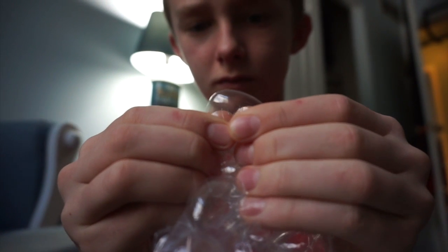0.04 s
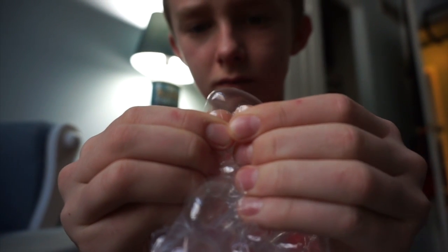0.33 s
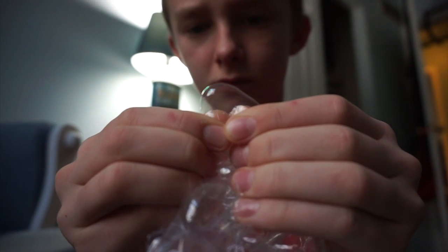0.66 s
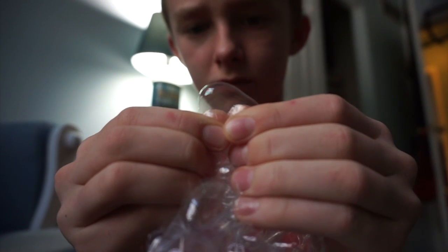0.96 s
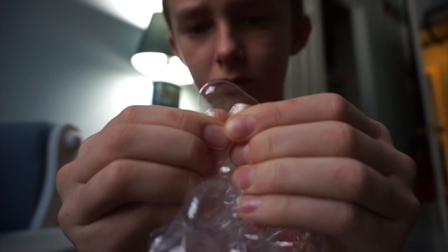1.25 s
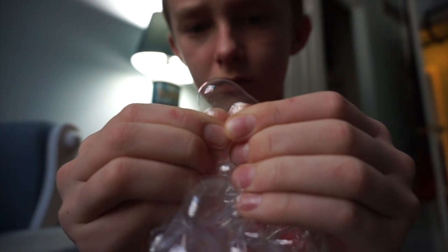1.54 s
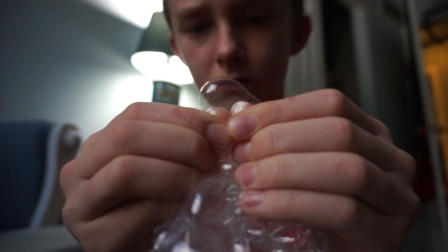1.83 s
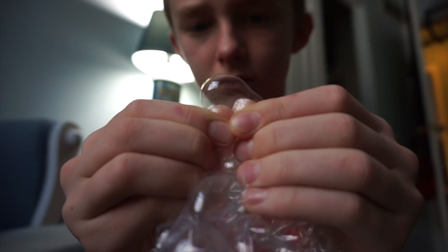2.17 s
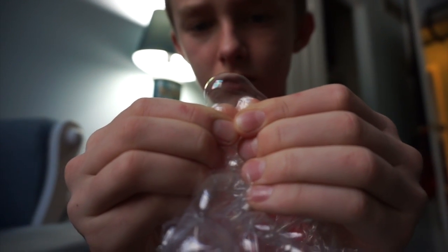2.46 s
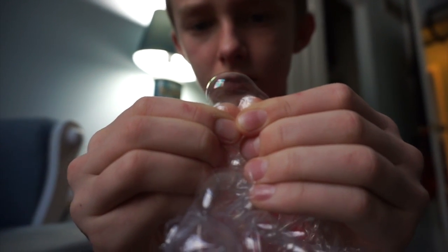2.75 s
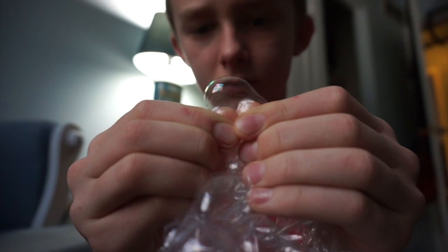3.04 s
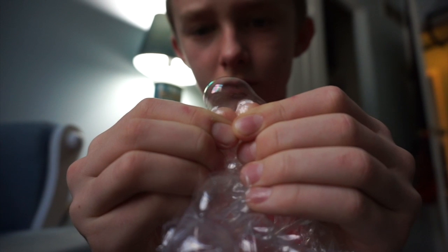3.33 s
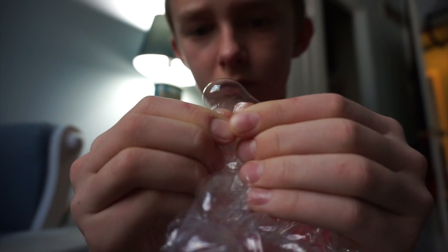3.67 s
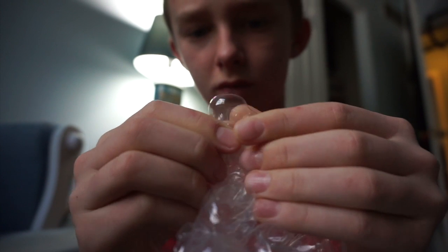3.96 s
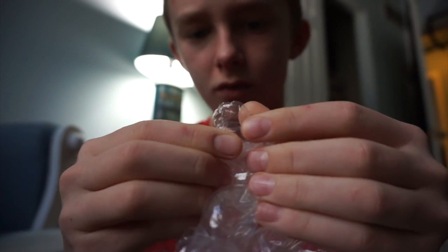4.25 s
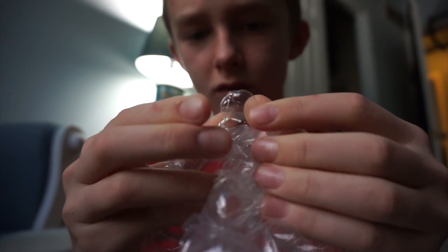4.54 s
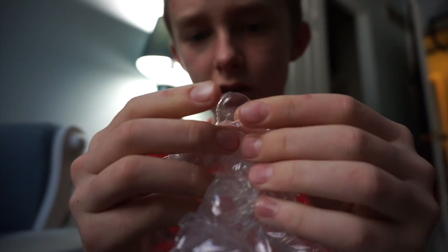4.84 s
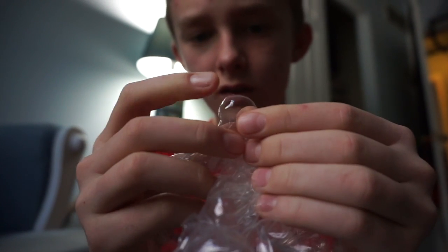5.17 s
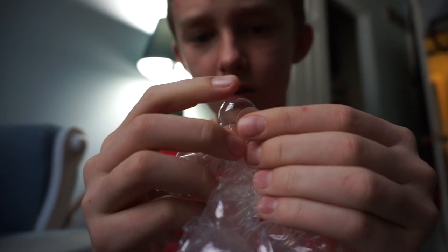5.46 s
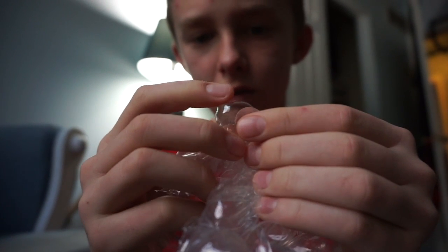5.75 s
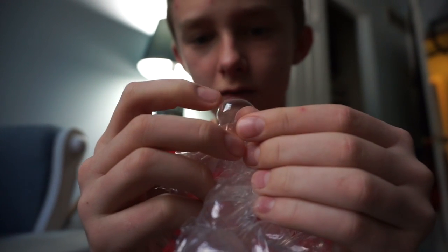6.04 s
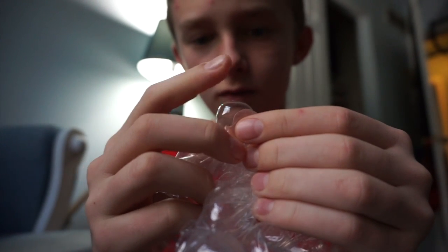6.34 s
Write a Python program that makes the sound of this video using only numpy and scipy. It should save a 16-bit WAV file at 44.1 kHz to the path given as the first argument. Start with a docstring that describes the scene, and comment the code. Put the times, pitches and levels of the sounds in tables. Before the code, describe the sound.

Close, sparse ticks of squeezed bubble wrap build into two seconds of crumpling, followed by sharp plastic snaps in a quiet room.

```python
"""Sparse ticks and snaps of bubble wrap pinched between two hands, close by in a small room.
The film ticks as pressure builds, crumples for two seconds as it is twisted, then gives a few sharp snaps.
Each is made of tiny buckles: a crease clicks, the film around it flexes and an air pocket rings.
The walls answer briefly, and a faint room tone lies underneath."""
import sys
import numpy as np
from scipy import signal
from scipy.fft import rfft, irfft, next_fast_len
from scipy.io import wavfile

SR = 44100
rng = np.random.default_rng(int(sys.argv[2]) if len(sys.argv) > 2 else 0)


def to_wav(s):
    """Save 16-bit WAV."""
    ch = np.atleast_2d(s).T  # columns
    pcm = np.round(np.clip(ch, -1, 1) * 32767)  # PCM
    wavfile.write(sys.argv[1], SR, pcm.astype(np.int16))


N = 282240
TOP_HZ = 11150  # upper edge of the treble


def amp(db):
    """Decibels to gain."""
    return 10 ** (np.asarray(db) / 20)


def along(points, hz):
    """Read a curve of (Hz, value) points on a log frequency axis."""
    point_hz, values = np.transpose(points)
    return np.interp(np.log(hz + 1), np.log(point_hz), values)


def filtered(x, gain):
    """Minimum-phase EQ with the curve gain(hz), so nothing rings ahead of a click."""
    size = 2 * next_fast_len(N // 2 + SR // 4)
    cepstrum = irfft(np.log(np.maximum(gain(np.fft.rfftfreq(size, 1 / SR)), 1e-6)))
    cepstrum[1:size // 2] *= 2
    cepstrum[size // 2 + 1:] = 0
    return irfft(rfft(x, size) * np.exp(rfft(cepstrum)), size)[:, :N]


def room_tone(level_db=-68.5):
    """Steady air noise of the room with a little hiss, wide except in the bass."""
    # Each row: frequency in Hz, relative noise density in dB.
    spectrum = [(24, -70), (40, -46), (124, -17.5), (156, -21), (332, -13.5), (518, -7), (656, -7),
                (1000, -1), (1180, -7), (1420, 1.5), (1720, -3.5), (2170, -4.5), (7730, -10.5), (10000, -9),
                (11000, -9), (14300, -41), (22000, -120)]
    # Each row: frequency in Hz, likeness of left and right (1 is mono, negatives count as 0).
    likeness = [(60, 0.64), (220, 0.15), (840, -0.077), (3120, 0.02), (11600, 0.14)]

    def noise(share):
        def gain(hz):
            width = np.arccos(np.clip(along(likeness, hz), 0, .99)) / 2
            return amp(along(spectrum, hz)) * share(width) / (1 + (hz / TOP_HZ) ** 40)
        return filtered(rng.standard_normal((1, N)), gain)[0]

    mid, side = noise(np.cos), noise(np.sin)
    return amp(level_db) * np.array([mid + side, mid - side]) / mid.std()


def room_reverb(x, wall_s=.0108, near_db=-11, slap=0.26, tails=5):
    """Weak scatter off the hands, the nearest wall, then a diffuse tail that changes as the sheet moves."""
    # Each row: frequency in Hz, seconds to die away by 60 dB.
    decay = [(200, 0.14), (1000, .26), (3000, 0.34), (7000, 0.33), (11000, .28)]
    # EQ of the reverb return. Each row: frequency in Hz, gain in dB.
    return_eq = [(200, -12.5), (1000, -9), (2500, -7), (5000, -8), (10000, -7.5)]
    wet = np.zeros((2, N))
    wall = int(wall_s * SR)
    active_tail = np.arange(N) // (SR // 70) % tails  # the send moves on 70 times a second
    for k in range(tails):
        hz, t, noise = signal.stft(rng.standard_normal((2, SR // 2)), SR, nperseg=256)
        fade = amp(-60 * t / along(decay, hz)[:, None])
        tail = signal.istft(noise * fade, SR, nperseg=256)[1]
        tail[:, :wall] *= amp(near_db)
        tail[:, :SR // 700] = 0  # 1.4 ms of pre-delay
        tail /= np.linalg.norm(tail[0])
        tail[:, wall] += slap
        send = x.mean(0, keepdims=True) * (active_tail == k)
        wet += signal.fftconvolve(send, tail, axes=1)[:, :N]
    return filtered(wet, lambda hz: amp(along(return_eq, hz)))


def rings(times, db, hz, spread_octaves, t60_s, left_db, pan_spread_db, skew_rad, modes=3):
    """A few damped modes per buckle, pitched anew each time; left and right differ in level and phase."""
    t = np.arange(int(t60_s * SR)) / SR
    detune, skew, weight = rng.standard_normal((len(times), 3, modes, 1)).swapaxes(0, 1)
    phase = 2 * np.pi * hz * 2 ** (spread_octaves * detune) * t
    lead = skew_rad * skew
    strength = np.sign(weight) * (1 + np.abs(weight))
    envelope = amp(-60 * t / t60_s) * (1 - np.exp(-2 * np.pi * hz * t))
    pair = np.array([(strength * np.sin(phase + side * lead)).sum(1) * envelope for side in (1, -1)])
    energy = (pair.mean(0) ** 2 + pair.var(0) / 2).sum(1) / (SR / 1000)  # as power over 1 ms
    pan = left_db + pan_spread_db * rng.standard_normal(len(times))
    pair *= (amp(db + np.array([pan, -pan]) / 2) / np.sqrt(energy))[..., None]
    starts = np.round(np.abs(times) * SR).astype(int)
    samples = (starts[:, None] + np.arange(len(t))).ravel()
    return np.array([np.bincount(samples, side.ravel(), N)[:N] for side in pair])


def buckles(times, pocket_db, film_db, crease_db):
    """Each buckle rings a hollow air pocket, the bright film and the sharp crease itself."""
    pocket = rings(times, pocket_db, hz=1080, spread_octaves=.45, t60_s=0.012,
                   left_db=-2.5, pan_spread_db=1.6, skew_rad=0.22, modes=2)
    film = rings(times, film_db, hz=3020, spread_octaves=.4, t60_s=0.0047,
                 left_db=-3.0, pan_spread_db=3.5, skew_rad=.35)
    crease = rings(times, crease_db, hz=8680, spread_octaves=.25, t60_s=0.0018,
                   left_db=-2.5, pan_spread_db=2, skew_rad=0.38)
    return pocket + film + crease


def scatter(count, spread_db):
    """Random buckle sizes in dB, of mean power 1, none far above the rest."""
    db = spread_db * np.minimum(rng.standard_normal(count), 2)
    return db - 10 * np.log10(np.mean(amp(db) ** 2))


def strain(level_db=-64, film_db=-5.0, crease_db=-5, count=90):
    """The film under pressure keeps ticking faintly."""
    times = rng.random(count) * N / SR
    size = level_db + scatter(count, spread_db=1.5)
    film = size + film_db + scatter(count, spread_db=-0.5)
    crease = size + crease_db + scatter(count, spread_db=2)
    return buckles(times, size, film, crease)


def crumple(pocket_db=-2.0, film_db=-3.0, crease_db=-4.0, count=2400):
    """Twisting sets off a stream of small buckles, denser as it gets louder."""
    # Swell of the twist. Each row: time in seconds, pocket level in dB, film and crease level in dB,
    # both before the trims.
    twist = [(3.44, -67, -68), (3.47, -62, -53), (3.57, -58, -51), (3.64, -47.5, -44), (3.69, -44, -39),
             (3.73, -45, -42), (3.78, -48, -45), (3.83, -47, -43), (3.87, -58, -50), (3.915, -55, -52),
             (3.935, -49, -48), (3.98, -52, -50), (4.05, -61, -48), (4.09, -56, -47), (4.14, -48, -44.5),
             (4.18, -45, -38), (4.24, -52, -46), (4.3, -53, -52), (4.355, -57, -55), (4.4, -51, -47),
             (4.45, -54.5, -47), (4.48, -44, -40), (4.52, -37, -38), (4.56, -52, -47.5), (4.6, -54, -48),
             (4.65, -41, -42), (4.7, -54, -49), (4.76, -45.5, -46), (4.82, -50, -47), (4.87, -53, -50),
             (4.93, -49.5, -46), (5.0, -53, -56), (5.06, -63, -54), (5.13, -64, -63), (5.29, -67, -56),
             (5.36, -70, -66)]
    twist_s, hollow_db, bright_db = np.transpose(twist)
    grid = np.linspace(twist_s[0], twist_s[-1], SR // 10)
    density = amp(.6 * np.interp(grid, twist_s, bright_db))
    density *= count / (density.mean() * np.ptp(grid) * 1000)  # buckles per millisecond
    times = np.interp(rng.random(count), np.cumsum(density) / density.sum(), grid)
    crowding_db = 10 * np.log10(np.interp(times, grid, density))  # close buckles share the level
    size = scatter(count, spread_db=7.5) - crowding_db
    bright = size + np.interp(times, twist_s, bright_db)
    pocket = size + np.interp(times, twist_s, hollow_db) + pocket_db + scatter(count, spread_db=3)
    film = bright + film_db + scatter(count, spread_db=5)
    crease = bright + crease_db + scatter(count, spread_db=4.5)
    return buckles(times, pocket, film, crease)


def collapses(pocket_db=-4, film_db=-3.0, crease_db=-8, per_fold=16):
    """A whole fold gives way: many buckles within a few milliseconds."""
    # Each row: centre in seconds, half width in seconds, level in dB before the trims.
    folds = [(3.8095, 0.0031, -32.5), (3.8152, .0016, -23), (4.058, .0015, -34.5), (4.4655, .002, -30.5),
             (4.507, .002, -32)]
    centre_s, half_width_s, db = np.repeat(folds, per_fold, axis=0).T
    times = centre_s + half_width_s * rng.uniform(-1, 1, len(db))
    spacing_ms = 2000 * half_width_s / per_fold
    size = db + 10 * np.log10(spacing_ms) + scatter(len(db), spread_db=3.5)
    return buckles(times, size + pocket_db, size + film_db, size + crease_db)


def snaps(pocket_db=-1.84, film_db=-1.63, crease_db=0.45):
    """The buckles that stand out singly, from light ticks to sharp cracks."""
    # Each row: start in seconds, then pocket, film and crease levels in dB before the trims.
    hits = [(0.1748, -38.5, -45.5, -49.5), (0.1784, -55, -56, -66), (0.2469, -53, -53, -55),
            (0.3247, -49, -46.5, -65), (0.3479, -59, -50.5, -61), (0.3803, -68, -46, -61),
            (0.404, -54, -57, -60), (0.4216, -73, -63, -47.5), (0.5514, -63, -48.5, -62),
            (0.5869, -49, -43, -35.5), (0.9043, -54, -49.5, -42.5), (1.3442, -39, -52.5, -60),
            (1.3475, -55, -71, -76), (1.4155, -70, -54.5, -62), (1.6316, -56, -52, -64),
            (1.6859, -50, -53, -53.5), (1.6923, -50, -38.5, -64), (1.7462, -45.5, -54, -61),
            (2.0927, -49.5, -51.5, -58), (2.4235, -42.5, -51, -77), (2.7553, -76, -44.5, -44.5),
            (2.7622, -72, -62, -52), (2.8792, -55.5, -57, -49), (3.3335, -56.5, -54.5, -55),
            (3.4463, -51, -64, -61), (3.452, -72, -65, -50), (3.4623, -76, -53, -38.5),
            (3.4735, -52, -57, -34.5), (3.4877, -53, -61, -42), (3.4988, -61, -52, -46),
            (3.5098, -52, -50, -33.5), (3.5272, -50, -38.5, -34), (3.5319, -54, -35.5, -31),
            (3.564, -60, -33.5, -41), (3.5884, -32.5, -44, -30), (3.598, -34, -30, -45),
            (3.6066, -27.5, -39, -42), (3.6233, -32, -28.5, -30.5), (3.6345, -54, -38, -35),
            (3.7045, -28, -25.5, -35), (3.7269, -24, -30, -36), (3.7715, -53, -34, -38),
            (3.7831, -41, -39, -39), (3.8101, -28, -29, -25), (3.815, -19, -21, -34),
            (3.9352, -30.5, -38.5, -42), (4.0131, -38, -33.5, -35.5), (4.0396, -53, -42, -40),
            (4.0544, -46, -33, -31), (4.058, -37, -26, -32), (4.1084, -31.5, -27.5, -35),
            (4.1151, -29, -25.5, -31.5), (4.2001, -38, -28, -28.5), (4.2146, -30.5, -25.5, -39),
            (4.231, -64, -40, -43), (4.2945, -40, -37, -41), (4.3202, -47, -33.5, -33.5),
            (4.3296, -34, -38.5, -40), (4.3965, -40.5, -33.5, -40), (4.4627, -34, -27, -35),
            (4.4655, -24.5, -25, -26), (4.496, -41, -25.5, -38), (4.5065, -43, -31, -27.5),
            (4.5116, -36, -26, -31), (4.5315, -32, -31, -30.5), (4.5763, -35, -45, -47),
            (4.5836, -54, -40, -19.5), (4.624, -40, -35, -38), (4.6334, -38, -33, -31),
            (4.6705, -31, -28.5, -31), (4.6902, -43, -39, -53), (4.7137, -40, -30, -32.5),
            (4.7378, -45, -36.5, -35.5), (4.7418, -53, -36, -41), (4.7496, -57, -34, -40),
            (4.7526, -45, -41, -41), (4.8267, -52, -34.5, -43), (4.8947, -39, -32, -39.5),
            (4.9164, -43, -31.5, -32.5), (4.9205, -52, -32, -36), (4.9635, -32, -32, -31.5),
            (5.0073, -50, -45, -32.5), (5.0326, -49, -44, -54), (5.054, -40.5, -31, -45.5),
            (5.0838, -55, -48, -40.5), (5.1004, -57, -49, -42.5), (5.1493, -61, -39.5, -52),
            (5.1636, -43.5, -35.5, -51), (5.1928, -64, -67, -57), (5.2173, -59, -55, -46),
            (5.2213, -41, -33, -41.5), (5.2602, -60, -54, -63), (5.2769, -59, -62, -67),
            (5.2897, -52, -41.5, -49), (5.2992, -57, -43, -40.5), (5.3201, -67, -64, -56),
            (5.4565, -56, -52.5, -67), (5.4754, -61, -45, -55), (5.4934, -50, -44, -46.5),
            (5.5282, -59, -59, -61), (5.6523, -55, -51.5, -69), (5.786, -66, -43.5, -44.5),
            (5.7898, -72, -64, -40.5), (5.8155, -63, -66, -60), (5.8255, -59, -47, -58),
            (5.8672, -52.5, -45, -41.5), (5.8824, -55, -50, -52), (5.9057, -58, -21, -17.5),
            (5.9263, -50, -20.5, -22), (6.0207, -46, -19, -19), (6.0349, -37, -21, -23),
            (6.0409, -57, -30, -28.5), (6.0457, -39, -28, -22), (6.0487, -60, -32, -29),
            (6.053, -54, -25, -32), (6.2147, -76, -60, -61), (6.2592, -61, -56, -50.5),
            (6.3055, -37, -32.5, -31.5), (6.3114, -67, -42, -43)]
    times, pocket, film, crease = np.transpose(hits)
    return buckles(times, pocket + pocket_db, film + film_db, crease + crease_db)


def scene():
    """The sheet, its room and the quiet behind it."""
    # The sheet radiates little bass. Each row: frequency in Hz, gain in dB.
    sheet_eq = [(30, -19.5), (120, -28), (200, -23), (300, -16.5), (450, -6), (680, -6.5), (1100, 1.5),
                (1450, 1), (2300, 1), (3500, 1), (5500, 4), (8000, 0), (10800, 3)]
    crackle = snaps() + crumple() + collapses() + strain()
    sheet = filtered(crackle, lambda hz: amp(along(sheet_eq, hz)))
    return sheet + room_reverb(sheet) + room_tone()


def record(dry):
    """A steep low-pass takes off the highest treble."""
    size = next_fast_len(N + SR // 4)
    hz = np.fft.rfftfreq(size, 1 / SR)
    return irfft(rfft(dry, size) / np.sqrt(1 + (hz / TOP_HZ) ** 130), size)[:, :N]


dry = scene()
out = record(dry)
to_wav(out)
```